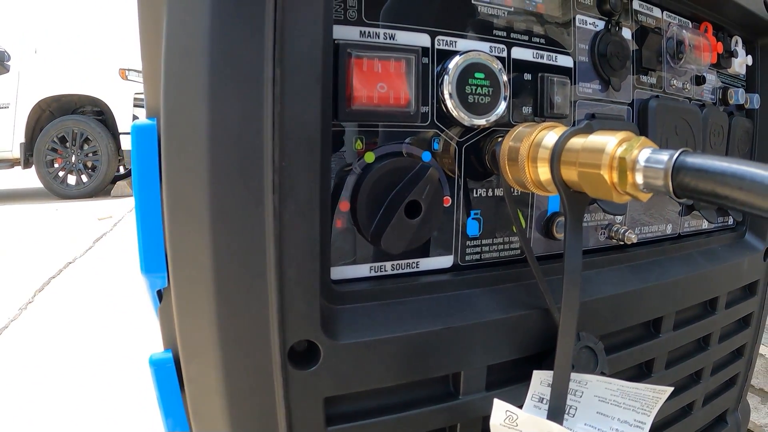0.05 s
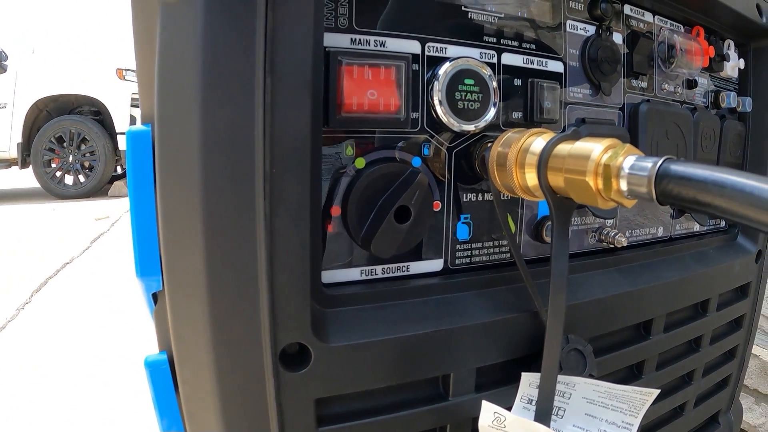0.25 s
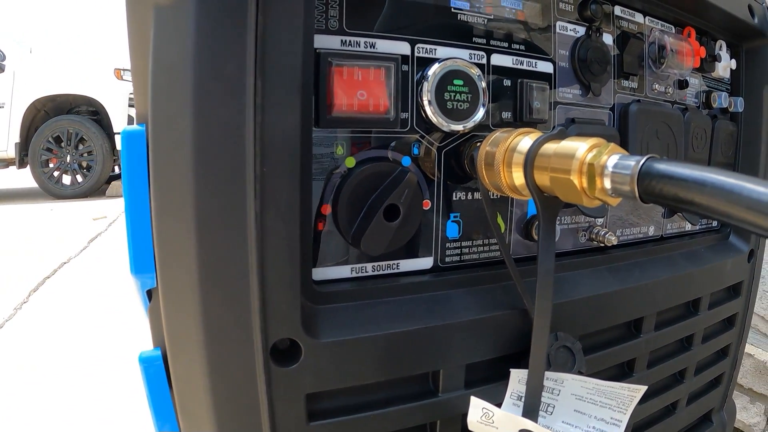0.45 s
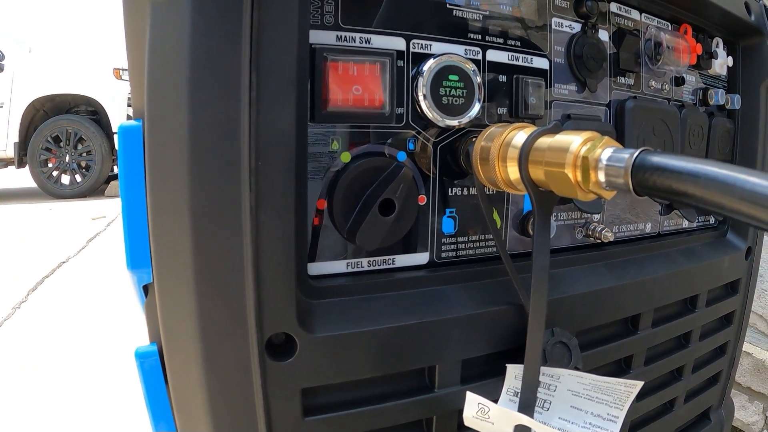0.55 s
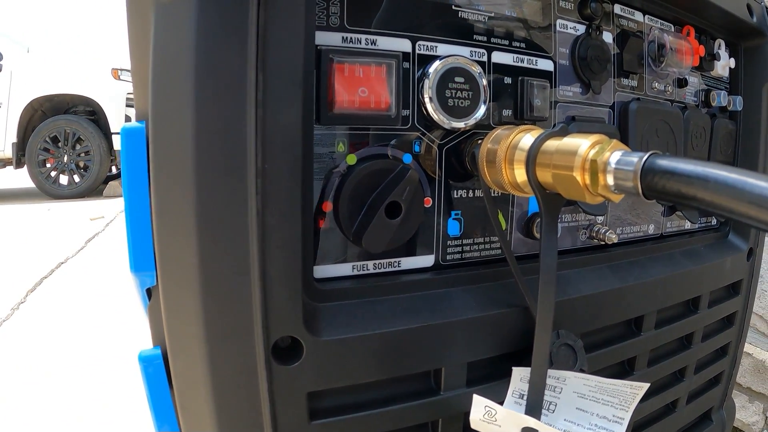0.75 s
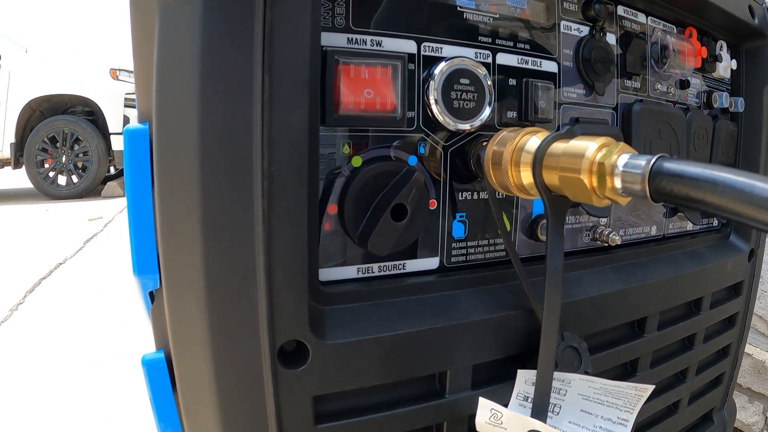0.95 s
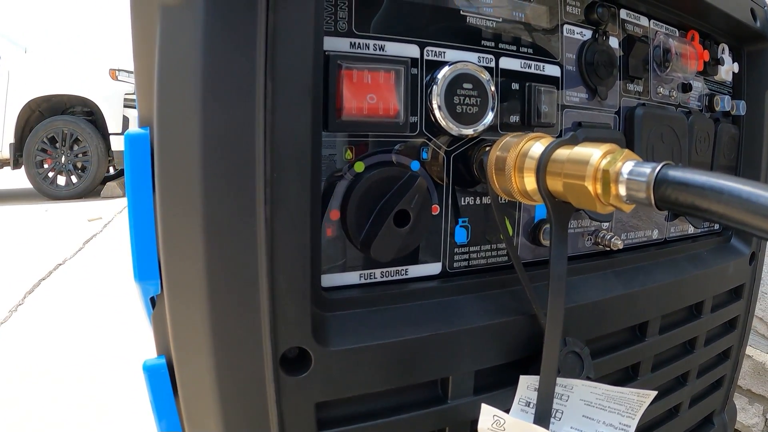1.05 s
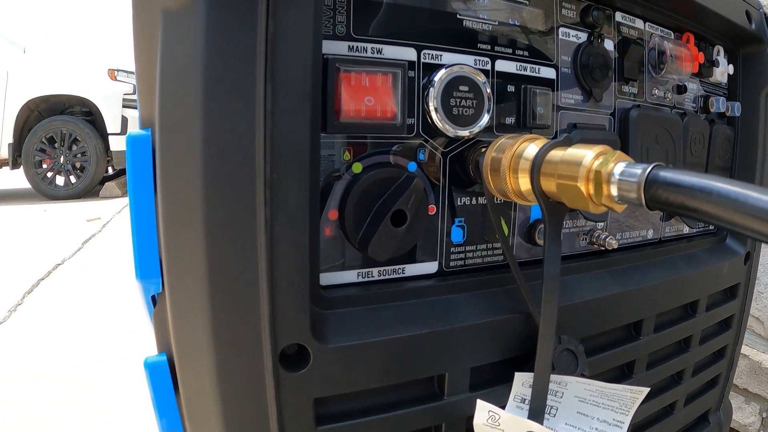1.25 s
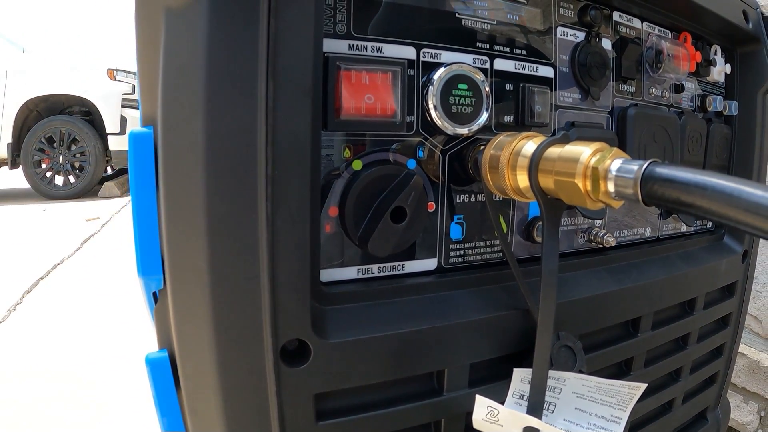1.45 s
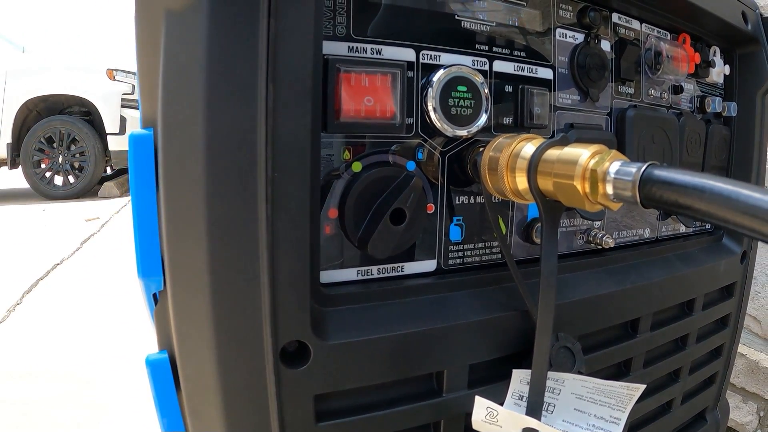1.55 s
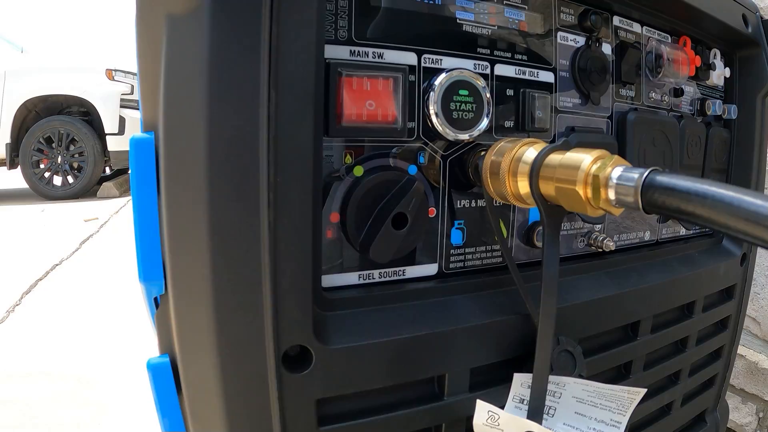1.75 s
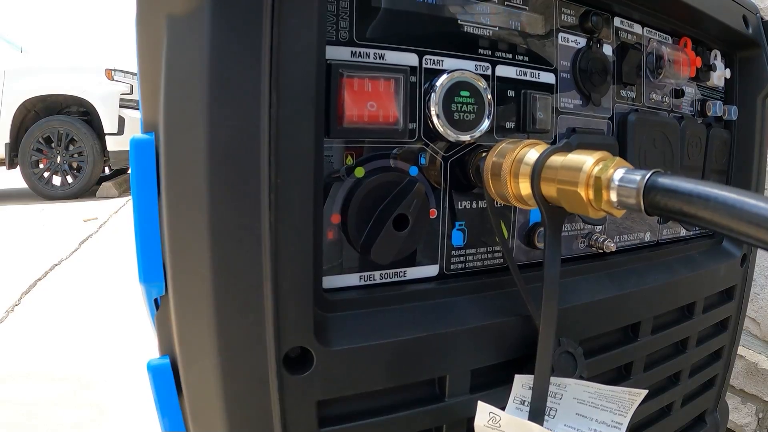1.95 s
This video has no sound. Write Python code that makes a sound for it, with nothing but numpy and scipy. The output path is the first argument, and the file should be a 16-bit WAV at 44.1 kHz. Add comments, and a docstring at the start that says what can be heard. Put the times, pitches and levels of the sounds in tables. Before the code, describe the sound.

An electric starter clunks in and cranks a portable generator, gear whine climbing, without catching

```python
"""An electric starter cranks a portable generator, close by and outdoors: modulated partials whine up to speed
while one knock per gear tooth excites resonances of the metal. Each compression loads the gears and then
leaves them slack for a moment. Decaying modes and noise make the opening clunk of the pinion,
noise-driven resonances the chinks of catching teeth, short sine pulses the soft exhaust puffs, shaped noise
the quiet air. The left channel is almost silent: a very quiet copy of the sound and steady, low-weighted noise."""
import sys
import numpy as np
from scipy import signal
from scipy.fft import rfft, irfft
from scipy.io import wavfile
from scipy.ndimage import uniform_filter1d

SR = 44100
rng = np.random.default_rng(int(sys.argv[2]) if len(sys.argv) > 2 else 0)


def digitize_waveform(pressure):
    """Quantize a signal to 16-bit integers and store it at the path in sys.argv[1].

    Rows of a 2-D input are taken as channels; values are limited to [-1, 1].
    """
    field = np.atleast_2d(pressure).T
    bounded = np.clip(field, -1, 1)
    quanta = np.round(bounded * 32767).astype(np.int16)
    wavfile.write(sys.argv[1], SR, quanta)


N = 88200
T = np.arange(N) / SR  # time in s
SHAFT_PER_TOOTH = .127  # shaft cycles per tooth passed


def amp(db):
    """Level law: decibels to an amplitude ratio."""
    return 10 ** (np.asarray(db) / 20)


def unit(x):
    """Normalization to a root-mean-square value of 1."""
    return x / np.sqrt(np.mean(x ** 2) + 1e-20)


def curve(points):
    """Linear interpolation in time between (t/s, value) points."""
    return np.interp(T, *np.transpose(points))


def bump(at, width):
    """Gaussian pulse in time with standard deviation width."""
    return np.exp(-.5 * ((T - at) / width) ** 2)


def decay(at, t60):
    """Exponential decay after a sudden onset, 60 dB in t60 seconds."""
    return (T >= at) * amp(-60 * np.maximum(T - at, 0) / t60)


def colour(x, points):
    """Linear filtering: weights the spectrum by (f/Hz, level/dB) points, then normalizes."""
    hz, db = np.transpose(points)
    freqs = np.fft.rfftfreq(N, 1 / SR)
    gain = amp(np.interp(np.log(freqs + 1), np.log(hz), db))
    return unit(irfft(rfft(x) * gain, N))


def wander(hz):
    """Low-pass noise of unit rms: random fluctuation mostly slower than hz."""
    freqs = np.fft.rfftfreq(N, 1 / SR)
    lowpass = 1 / (1 + (freqs / hz) ** 2) ** 2
    return unit(irfft(rfft(rng.standard_normal(N)) * lowpass, N))


def jolt(angle):
    """Fourier sum of two harmonics: a cycle that rises fast and falls slowly."""
    return np.sin(angle) + 0.27 * np.sin(2 * angle)


def ring(x, modes):
    """Modal resonance: x drives (f/Hz, width/Hz, level/dB) modes whose strengths fluctuate."""
    flutter_db, skirt = 3, 1.21  # rms fluctuation; band edges as a ratio to the outer modes
    out = np.zeros(N)
    for hz, width, db in modes:
        mode = unit(signal.lfilter(*signal.iirpeak(hz, hz / width, SR), x))
        out += amp(db + flutter_db * wander(hz=35.4)) * mode
    edges = [modes[0][0] / skirt, modes[-1][0] * skirt]
    return unit(signal.sosfilt(signal.butter(2, edges, "band", fs=SR, output="sos"), out))


def starter():
    """Gear dynamics: compression torque slows and loads the mesh, and its release leaves backlash."""
    # Nominal tooth rate before sag and wobble: t/s, f/Hz
    speed = [(.24, 199.7), (.325, 299.5), (.385, 311.5), (.42, 368.9), (.46, 418.4), (.56, 496.2),
             (.66, 534.7), (.74, 553.5), (.9, 578.3), (1.1, 595.2), (1.4, 611.3), (2, 619.9)]
    # Compression strokes: peak t/s, load on the gears/dB, slack that follows/dB; each layer scales them
    strokes = [(0.598, 11.5, -3), (0.828, 6.5, -3), (1.041, 7.5, -2), (1.243, 7, -4), (1.443, 9, -2.5),
               (1.646, 5.5, -2.5), (1.85, 5.5, -2)]
    build_s, load_s = 0.012, 0.017  # pulse widths before and after the peak
    slack_after_s, slack_s = 0.019, 0.0061
    sag_share, sag_s, wobble = .045, .028, .009  # fractions of the rate; pulse width

    sag = sum(bump(at, sag_s) for at, _, _ in strokes)
    slowing = sag_share * sag * T / T[-1]  # deepens with time
    tooth_rate = curve(speed) * (1 - slowing + wobble * wander(hz=24.7))
    turns = np.cumsum(tooth_rate) / SR  # teeth passed
    load = sum(db * bump(at, np.where(T < at, build_s, load_s)) for at, db, _ in strokes)
    slack = sum(db * bump(at + slack_after_s, slack_s) for at, _, db in strokes)
    running = np.clip((T - speed[0][0]) / .02, 0, 1)
    gears = whine(turns) * amp(3.3 * slack) + rattle(turns, load, slack)
    return running * (gears + hum(turns, load) + groan(strokes))


def whine(turns):
    """Gear-mesh tones: partials locked to tooth passage, filtered by the radiation of the casing."""
    # Whine level: t/s, level/dB
    whine_level = [(.24, -35), (.32, -35.5), (.42, -40.5), (.55, -35), (.72, -36), (.9, -40.5), (1.3, -40),
                   (1.6, -39), (1.85, -43), (2, -45)]
    # Whine partials: multiple of the tooth rate, level/dB, roughness (modulation depth)
    partials = [(1, 1, 0.27), (2, -14, 0.48), (3, -4.5, 0.72), (4, -6.5, 0.88), (5, -19.5, 0.7), (6, -9, 1),
                (7, -21, 0.55), (12, -30.5, 0.72)]
    # Radiation of the whine by the casing: f/Hz, level/dB
    radiation = [(200, -30), (350, -8.5), (470, 5), (600, -1.5), (900, -11), (1200, 6.5), (1650, 5.5),
                 (1850, -4.5), (2150, -10), (2450, -5.5), (3050, 12.5), (3600, 8), (4200, 4.5), (5300, 22),
                 (8000, 11)]
    # Singing of the motor's own gear mesh: t/s, level/dB
    sing_level = [(.28, -64), (.335, -34), (.39, -32.5), (.47, -37), (.55, -38), (.61, -36), (.69, -35.5),
                  (.85, -33.5), (1.1, -41), (1.5, -67), (2, -52)]
    # Overtones of that mesh: multiple of its fundamental, level/dB
    overtone_modes = [(2, -12), (3, -16), (4, -22), (5, -23)]
    # Growl at one and a half times the tooth rate on the way up: t/s, level/dB
    growl_level = [(.42, -72), (.49, -34), (.55, -29), (.6, -24.5), (.63, -37.5), (.7, -58)]
    slip_teeth, sing_per_tooth, sing_flutter_db = .022, 4.22, 1.5
    fade_db_per_s, fade_from_s = 90, .385

    # One timing error shared by all partials shifts the phase of the high ones most.
    uneven = turns + slip_teeth * wander(hz=130)

    def partial(multiple, rough, phase=uneven):
        """Amplitude and phase modulation of one tone by complex noise."""
        modulation = 1 + rough * (wander(hz=68) + 1j * wander(hz=70))
        return unit((modulation * np.exp(2j * np.pi * multiple * phase)).real)

    stack = sum(amp(db) * partial(k, rough) for k, db, rough in partials)
    stack = amp(curve(whine_level)) * colour(stack, radiation)

    overtones = sum(amp(db) * partial(k * sing_per_tooth, rough=.7, phase=turns)
                    for k, db in overtone_modes)
    overtones = overtones * amp(-fade_db_per_s * np.maximum(T - fade_from_s, 0))
    flutter_onset = np.clip((T - .36) / 0.14, 0, 1)
    flutter = sing_flutter_db * flutter_onset * jolt(2 * np.pi * SHAFT_PER_TOOTH * turns)
    sing = unit(amp(flutter) * (partial(sing_per_tooth, rough=.25) + overtones))
    growl = amp(curve(growl_level)) * partial(1.5, rough=0.48)
    return stack + amp(curve(sing_level)) * sing + growl


def teeth(turns, scrape):
    """Impact excitation: one uneven, slightly mistimed impulse per tooth, plus scraping noise."""
    jitter_s, spread_db = .0002, 2  # standard deviations, the sizes limited to two of them
    at = np.flatnonzero(np.diff(np.floor(turns)))
    late, size = rng.standard_normal((2, len(at)))
    struck = np.clip(at + (late * jitter_s * SR).astype(int), 0, N - 1)
    knocks = np.zeros(N)
    knocks[struck] = amp(spread_db * np.clip(size, -2, 2))
    return unit(knocks - knocks.mean()) + scrape * rng.standard_normal(N)


def rattle(turns, load, slack):
    """Forced vibration: tooth impacts, modulated by the rotation, excite the metal parts."""
    # Resonances of the housing, the metal and the pinion: f/Hz, width/Hz, level/dB
    housing_modes = [(532, 20, -3.5), (760.3, 23, 8), (825, 21.5, 7), (1091, 180, -1.5), (1200, 50, -22),
                     (1506, 35, -2), (1675, 32, -7)]
    metal_modes = [(1107, 42, 7.5), (2750, 20, -11), (3541, 16.7, 5), (4424, 165, 0), (5227, 61, 0),
                   (5960, 130, -9.5), (6500, 150, -10), (7170, 50, -9.5)]
    pinion_modes = [(2405, 36, 0), (2470, 20.5, 0)]
    # Spectra of the casing's dull rumble and of the scraping hiss: f/Hz, relative level/dB
    body_spectrum = [(25, -18), (60, -4), (130, -0.5), (230, 0), (400, -4.5), (900, -2), (1600, -15),
                     (2600, -9), (4500, -44), (7000, -44)]
    hiss_spectrum = [(300, -58), (1200, -14), (2000, -9), (3300, 15.5), (5000, 11), (7000, 3), (9000, -1),
                     (10000, -2.5), (10900, 2.5), (12500, -3.5), (16000, -6)]
    # Levels before load, slack and rotation act on them: t/s, level/dB
    clatter_level = [(.24, -24), (.32, -44.5), (.42, -40.5), (.5, -35), (.57, -36), (.68, -30), (1, -31),
                     (1.25, -32.5), (1.42, -34.5), (1.5, -41), (1.6, -48), (1.72, -41.5), (2, -58.5)]
    body_level = [(.24, -34), (.35, -35.5), (.52, -42.5), (.7, -40), (.9, -35.5), (1.2, -37), (1.42, -36),
                  (1.58, -46.5), (1.72, -41), (1.8, -48.5), (2, -49.5)]
    ring_level = [(.24, -58), (.39, -43.5), (.45, -36.5), (.6, -35), (.8, -37.5), (1.1, -32), (1.4, -33.5),
                  (1.55, -33.5), (1.75, -35.5), (2, -41.5)]
    pinion_level = [(.24, -57), (.4, -44.5), (.45, -33), (.6, -40), (.68, -26.5), (.8, -34), (1, -36.5),
                    (1.35, -36), (1.44, -34.5), (1.65, -37.5), (1.83, -40), (1.93, -54), (2, -47.5)]
    hiss_level = [(.24, -64), (.3, -48.5), (.42, -42.5), (.58, -38), (1, -36.5), (1.42, -37), (1.5, -43),
                  (1.7, -48), (1.9, -60), (2, -66)]
    shaft_db, shaft_drift, lurch_per_tooth, lurch_db = 1.5, .9, .036, 0.5  # drift in rad rms

    shaft = shaft_db * jolt(2 * np.pi * SHAFT_PER_TOOTH * turns + shaft_drift * wander(hz=16))
    lurch = lurch_db * jolt(2 * np.pi * lurch_per_tooth * turns + 1.74 * wander(hz=3.2))
    force = amp(shaft + lurch)
    knocks = teeth(turns, scrape=1.0) * force

    clatter = ring(knocks, housing_modes) * amp(curve(clatter_level) + load + 1.4 * slack)
    body = colour(teeth(turns, scrape=1.72) * force, body_spectrum)
    body = body * amp(curve(body_level) + 0.42 * load + .6 * slack)
    metal = ring(knocks, metal_modes) * amp(curve(ring_level) + 3.4 * slack + 1.1 * shaft)
    pinion_db = curve(pinion_level) + 0.63 * load + 2.1 * slack + .5 * shaft
    pinion = ring(knocks, pinion_modes) * amp(pinion_db)
    hiss_db = curve(hiss_level) + .25 * load + 1.8 * slack + .5 * shaft + 0.8 * lurch
    hiss = colour(teeth(turns, scrape=1.6), hiss_spectrum) * amp(hiss_db)
    return clatter + body + metal + pinion + hiss


def hum(turns, load):
    """Rotational tone: the turning rotor hums at a fixed fraction of the tooth rate."""
    # Rotor hum before load and flutter: t/s, level/dB
    hum_level = [(.3, -64), (.7, -73), (1, -48), (1.4, -42.5), (1.6, -45.5), (2, -41.5)]
    hum_per_tooth, flutter_db = .313, 2.8
    tone = unit(np.sin(2 * np.pi * hum_per_tooth * turns))
    return tone * amp(curve(hum_level) + 1.07 * load + flutter_db * wander(hz=23.5))


def groan(strokes):
    """Resonance: noise through one low mode swells at each compression."""
    swell = sum(bump(at, 0.025) for at, _, _ in strokes)
    return amp(-39.5) * ring(rng.standard_normal(N), [(238, 35, 0)]) * swell


def engage():
    """Impact and free vibration: the pinion chatters into mesh, its blows ring modes and the frame thuds."""
    # Blows of the engaging pinion: t/s, level/dB
    blows = [(.2165, -39.5), (0.2228, -33), (0.2265, -20.5), (0.2312, -16.5), (0.236, -5), (0.24, -16.5),
             (0.265, -25)]
    # Modes those blows ring: f/Hz, level/dB, t60/s
    clunk_modes = [(341.3, -13.5, 0.16), (478, -13.5, 0.17), (516, -9.5, 0.16), (675.3, -12.5, 0.3),
                   (848.2, 6.5, 0.048), (1010, -17, 0.034), (1071, -6, .08), (1100, -15, 0.05),
                   (1503, -6, 0.038), (2360, -14.5, 0.068), (2767, -6.5, 0.032), (3744, -10.5, 0.063),
                   (6720, -24, 0.11)]
    # Spectrum of the crack of each blow: f/Hz, relative level/dB
    crack_spectrum = [(88, -50), (150, -11), (850, 1.5), (1510, -9.5), (1730, -14.5), (2360, -20),
                      (3210, -21.5), (3750, -19), (4050, -21), (15000, -35)]
    # Modes of the frame's thud: f/Hz, level/dB, t60/s
    frame_modes = [(147.5, -17, 0.29), (224, -8, 0.099)]
    crack_db, crack_t60_s, clunk_db = -4.5, 0.064, -6
    frame_at_s, frame_rise_s = .233, 0.019

    cracks, clunk = np.zeros(N), np.zeros(N)
    for at, db in blows:
        noise = colour(rng.standard_normal(N), crack_spectrum)
        cracks += amp(db + crack_db) * noise * decay(at, crack_t60_s)
    for hz, db, t60 in clunk_modes:
        energy = sum((amp(blow_db) * decay(at, t60)) ** 2 for at, blow_db in blows)
        swing = uniform_filter1d(np.sqrt(energy), size=30)  # softens the onsets
        clunk += amp(db + clunk_db) * swing * np.sin(2 * np.pi * (hz * T + rng.random()))
    since = T - frame_at_s
    rise = np.clip(since / frame_rise_s, 0, 1)
    thud = sum(amp(db) * decay(frame_at_s, t60) * np.sin(2 * np.pi * hz * since)
               for hz, db, t60 in frame_modes)
    return cracks + clunk + rise * thud


def chinks():
    """Resonance: now and then a tooth catches and one metal mode flashes in a Gaussian burst."""
    # Bright chinks: t/s, f/Hz, level/dB
    catches = [(.767, 5155, -29.5), (.877, 5146, -37), (1.238, 4260, -31.5), (1.491, 5250, -34),
               (1.568, 2402, -32.5)]
    length_s, width_hz = 0.0095, 94.2
    out = np.zeros(N)
    for at, hz, db in catches:
        out += amp(db) * bump(at, length_s) * ring(rng.standard_normal(N), [(hz, width_hz, 0)])
    return out


def exhaust():
    """Pulsed outflow: unburnt air leaves the muffler in soft puffs of a few cycles, each with a push."""
    # Exhaust puffs: start t/s, level/dB
    puffs = [(0.405, -25), (0.67, -25.5), (0.888, -23.5), (1.093, -25), (1.296, -24.5), (1.497, -25.5),
             (1.7, -26.5), (1.901, -28.5)]
    puff_hz, peak_s, width_s, push = 105.3, 0.014, 0.0086, 0.28
    out = np.zeros(N)
    for at, db in puffs:
        peak = at + peak_s
        cycles = bump(peak, width_s) * np.sin(2 * np.pi * puff_hz * (T - at))
        out += amp(db) * (cycles - push * bump(peak, 0.002))
    return out


def outdoor_air():
    """Broadband background: steady noise with a low-weighted spectrum."""
    # Spectrum of the air: f/Hz, relative level/dB
    air_spectrum = [(15, -7), (25, -0.5), (335, -22), (604, -19.5), (1120, -24), (1540, -25), (2020, -26.5),
                    (15000, -32)]
    return amp(-73) * colour(rng.standard_normal(N), air_spectrum)


def scene():
    """Superposition: the generator and the quiet outdoor air add up at one microphone."""
    mono = engage() + starter() + chinks() + exhaust() + outdoor_air()
    return np.array([mono, mono])


def record(dry):
    """Channel gain: full sound right, a very quiet copy and steady noise left; clipping, then a low-pass."""
    # Spectrum of the steady faint noise in the left channel: f/Hz, relative level/dB
    left_spectrum = [(25, -18), (150, -4), (1000, -18), (4000, -17.5), (15000, -31)]
    copy_db, left_noise_db, right_db = -47.5, -74, 5.5
    clip_at, edge_hz = 0.85, 15850
    left_noise = amp(left_noise_db) * colour(rng.standard_normal(N), left_spectrum)
    left = amp(copy_db) * dry[0] + left_noise
    both = np.clip([left, amp(right_db) * dry[1]], -clip_at, clip_at)
    lowpass = signal.firwin(511, edge_hz, window=("kaiser", 9), fs=SR)
    return signal.oaconvolve(both, lowpass[None], "same")


dry = scene()
out = record(dry)
digitize_waveform(out)
```